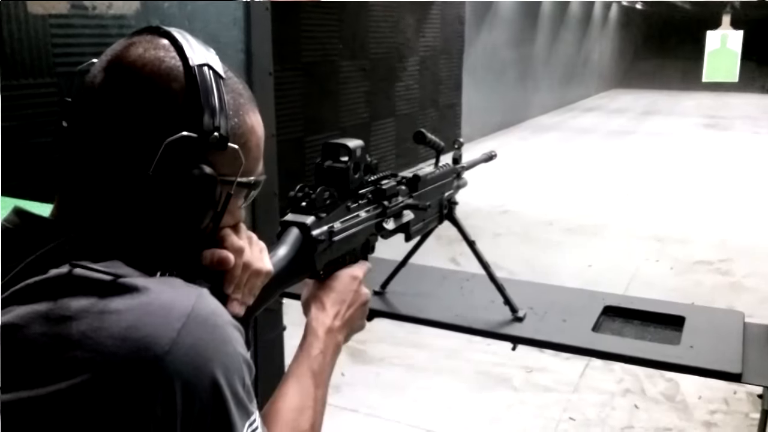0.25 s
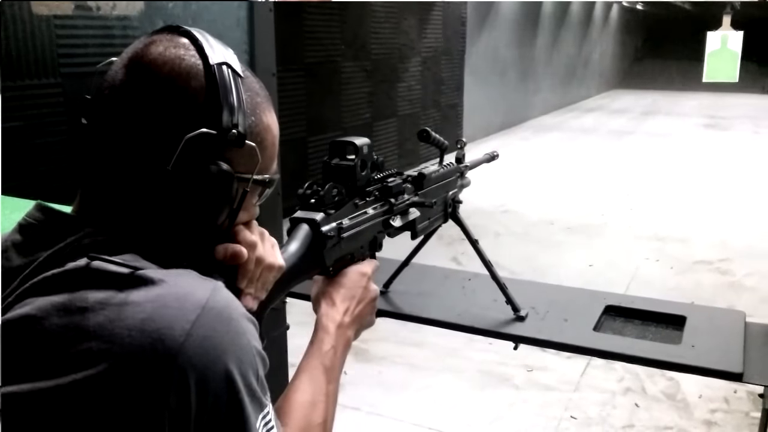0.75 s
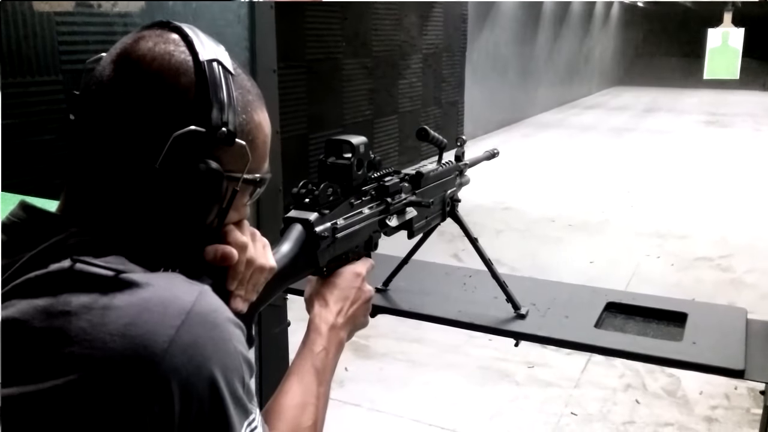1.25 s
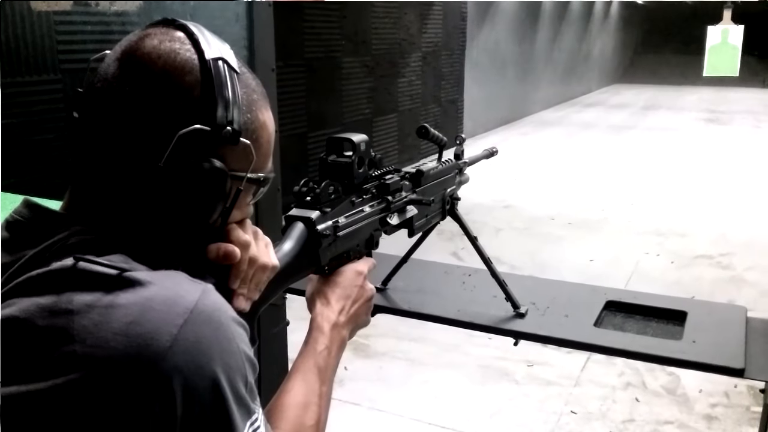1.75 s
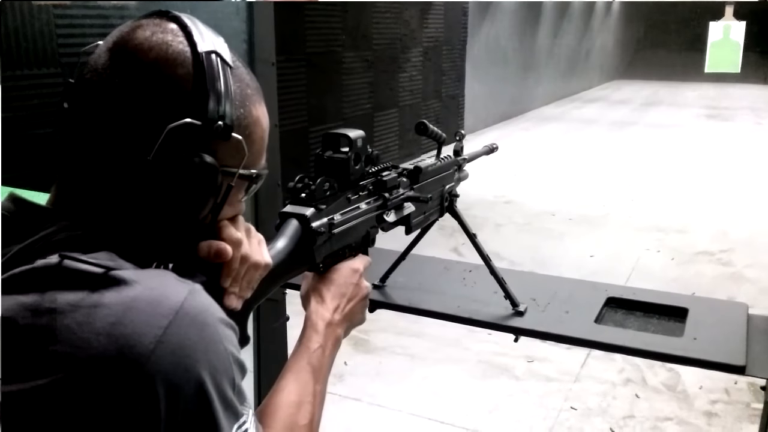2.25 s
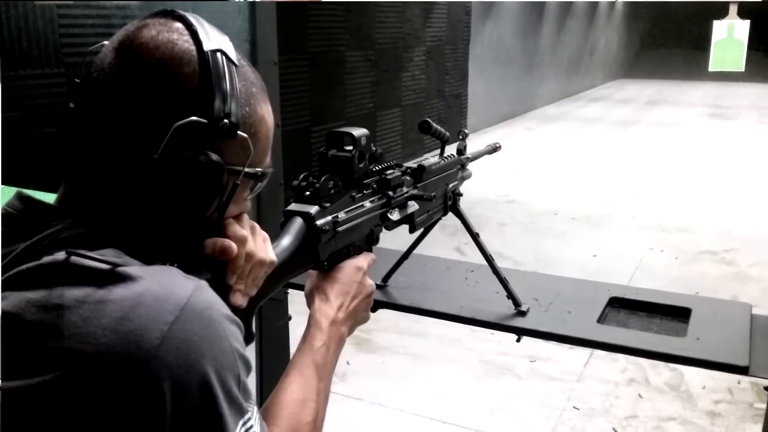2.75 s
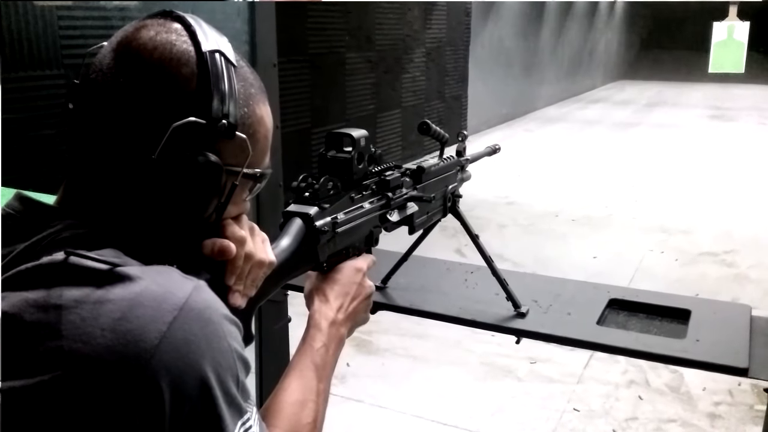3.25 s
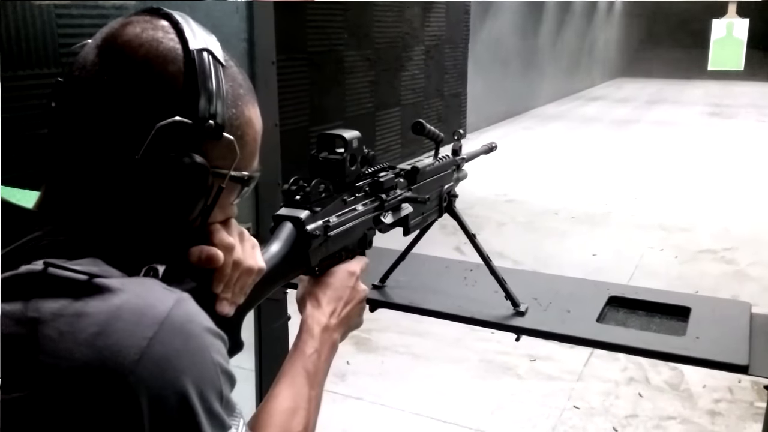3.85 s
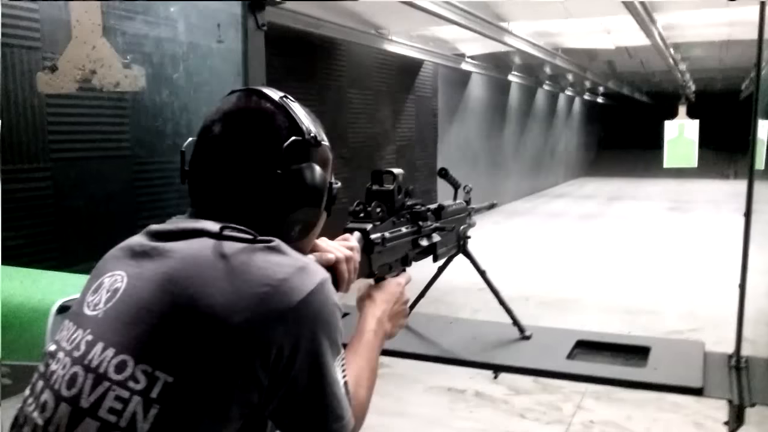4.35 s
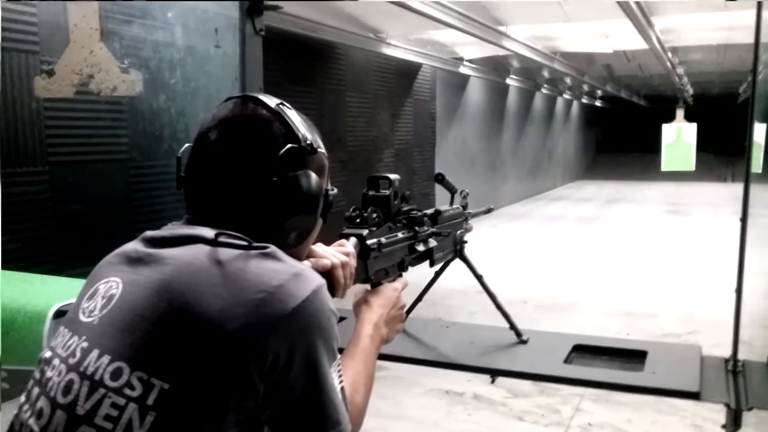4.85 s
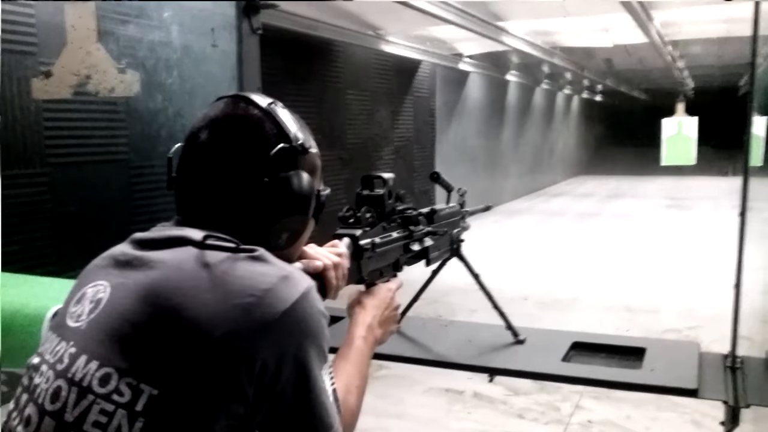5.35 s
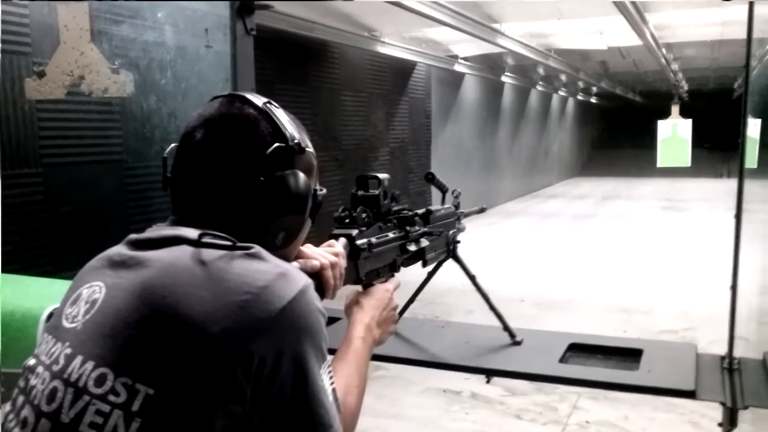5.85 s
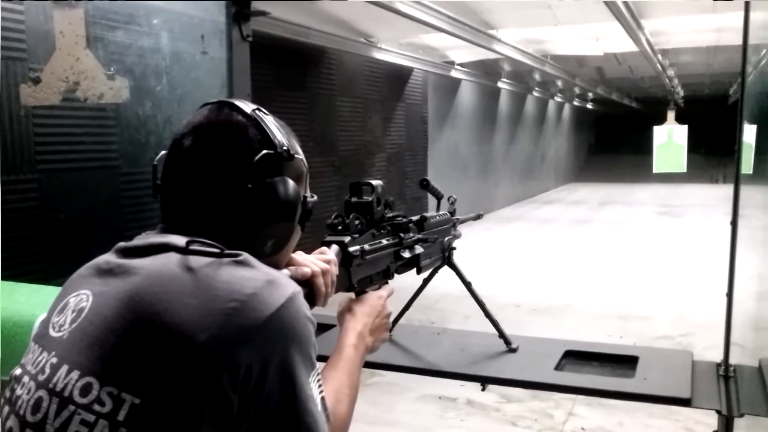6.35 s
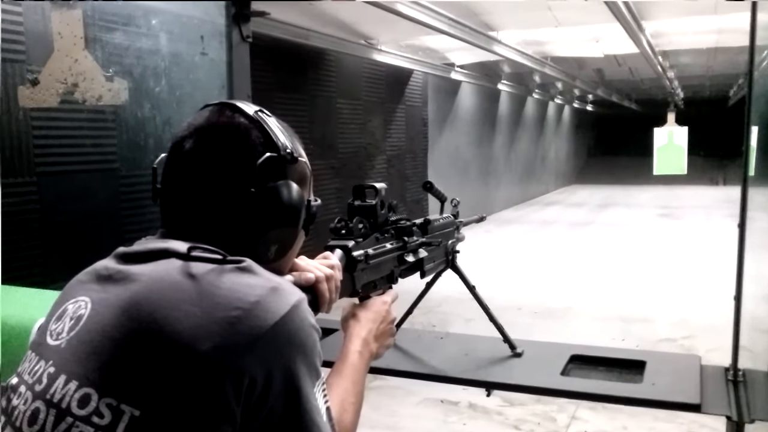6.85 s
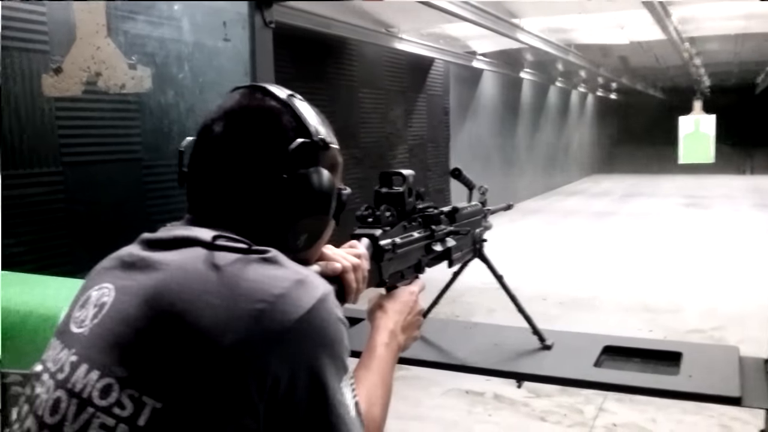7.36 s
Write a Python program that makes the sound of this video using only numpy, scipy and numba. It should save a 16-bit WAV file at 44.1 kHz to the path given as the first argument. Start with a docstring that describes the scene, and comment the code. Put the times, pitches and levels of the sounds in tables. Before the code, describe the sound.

Six spaced, distorted gun blasts with long hall echoes, bolt rattle and tinkling cases; an abrupt cut to rushing air comes after the fourth.

```python
"""Rushing air is heard loud over a steady fan until a machine gun fires single heavy shots in a long concrete
range. At each shot the bolt rattles, then the blast fills the hall and overloads the two microphone ports of a
phone. As the echo dies, spent cases ring on the floor over the fan and the air, now heard fainter. A cut ends
the fourth shot early and opens with the air heard loud again and a thin whistle, from further behind the gun;
two more shots follow. Filtered noise makes air, bolt and echoes; fading tones make the brass and the boom of
the hall."""
import sys
import numpy as np
from scipy import signal
from scipy.fft import rfft, irfft, next_fast_len
from scipy.io import wavfile
from scipy.ndimage import uniform_filter1d
from numba import njit

SR = 44100
rng = np.random.default_rng(int(sys.argv[2]) if len(sys.argv) > 2 else 0)


def wav_out(sig):
    """Save sig, one row per channel (or a flat mono array), as 16-bit PCM at SR to the path in sys.argv[1]."""
    wavfile.write(sys.argv[1], SR, np.round(np.clip(np.atleast_2d(sig).T, -1, 1) * 32767).astype(np.int16))


N = 335601
CUT_S = 4.196
OVERLOAD_DB = -4.5  # level at which the ports flatten the sound
STEP = 32  # samples between envelope points

# The shots: time [t/s], blast before the crowding of echoes, over the overload point [level/dB],
# extra bass [level/dB], early thud and boom of the low mode, both against the blast [level/dB],
# bolt rattle at its peak [level/dB]
SHOTS = [(0.0556, 13, 8, -11, -7, -21), (1.068, 12.5, -1.5, 8, -14.5, -30.5),
         (1.9974, 12.5, -2.8, -13, -14.5, -34), (3.848, 10.5, -11.5, -20, -24, -29.5),
         (5.181, 12, -5, 10, -21.5, -21.5), (7.162, 12.5, -12.5, -17, -23, -26.5)]
# Echo of the hall: pitch [f/Hz], relative strength per Hz [level/dB], time to fall by 60 dB once
# the fall is under way [t/s], likeness of left and right [-1..1]
HALL_ECHO = [(40, -19, 2.5, 0.76), (98.7, -3.5, 1.72, 0.98), (202, -4.5, 1.36, 0.61), (292, -3, 1.82, 1),
             (400, -2.5, 1.497, 0.83), (726, -1, 1.74, 0.62), (1103, -2, 1.655, 0.12),
             (1976, -3.5, 1.29, -0.41), (2560, -2, 1.486, 0.27), (4000, -4.5, 1.274, -0.093),
             (5000, -3, 1.34, -0.013), (6800, -4.5, 0.72, 0.1), (10500, -12.5, 0.52, -0.8),
             (17100, -43.5, .4, 0)]


def undb(db):
    """Turn decibels into a plain amplitude factor."""
    return 10 ** (np.asarray(db) / 20)


def unit(x):
    """Scale a sound to an average (RMS) strength of 1."""
    return x / np.sqrt(np.mean(x ** 2))


def over_hz(table, hz):
    """Read the columns of a table along a log-frequency axis, with straight lines between rows."""
    f, *columns = np.transpose(table)
    return [np.interp(np.log(np.maximum(hz, 1)), np.log(f), c) for c in columns]


def narrow(hz, width_hz):
    """Noise ringing in one resonance: a tone that wavers."""
    b, a = signal.iirpeak(hz, hz / width_hz, fs=SR)
    return unit(signal.lfilter(b, a, rng.standard_normal(N)))


def diffuse(size):
    """Spectra of left and right for sound from all sides, combed by the flutter between the stall walls."""
    # Echo across the stall: pitch [f/Hz], share the walls return [0..1]
    returned = [(150, 0.1), (300, .7), (700, 0.64), (1200, 0.15), (2500, 0.027)]
    flutter_s = .00998
    hz = np.arange(size // 2 + 1) * SR / size
    like = np.clip(over_hz(HALL_ECHO, hz)[2], -1, 1)
    mid, side = rfft(rng.standard_normal((2, size)))
    share = np.clip(over_hz(returned, hz)[0], 0, 1)
    back = share * np.exp(-2j * np.pi * hz * flutter_s)
    pair = np.sqrt(1 + like) * mid + np.sqrt(1 - like) * side * np.array([[1], [-1]])
    return hz, pair * (1 + back) / np.sqrt(1 + abs(back) ** 2)


def walk(rate):
    """Random levels held for about 1 / rate seconds and smoothed twice, at envelope points."""
    k = int(SR / STEP / rate)
    held = np.repeat(rng.standard_normal(N // 1000), k)[:N // STEP + 1]
    return uniform_filter1d(uniform_filter1d(held, k), k)


def full(envelope):
    """Fill in the samples between envelope points."""
    return np.interp(np.arange(N), np.arange(len(envelope)) * STEP, envelope)


def air():
    """Rushing air is shaped noise; a narrow resonance in noise makes the whistle that swells now and then."""
    # Colour of the rush: pitch [f/Hz], relative strength per Hz [level/dB]
    rush_colour = [(18, -44), (30, 11.5), (100, 7), (345, -3.5), (415, -5), (449, -7), (600, -9.5),
                   (937, -16), (2350, -15), (4910, -17), (9220, -36), (11700, -45), (16000, -49.5)]
    # Faint air after a loud stretch: before the cut, after the cut [level/dB]
    faint_db = [-53.5, -47]
    # Swells of the whistle: time [t/s], strength added [level/dB]
    whistle_swells = [(4.51, -58), (4.64, -56), (4.74, -60), (4.835, -48), (5.0, -53), (5.05, -57),
                      (5.115, -54)]
    loud_db, sag_db_per_s = -26.5, 4.5
    whistle_hz, whistle_width_hz, whistle_db = 11500, 60, -64
    rise_s, whistle_t60_s = .012, 0.28

    size, t = next_fast_len(N), np.arange(N) / SR
    hz, pair = diffuse(size)
    rush = irfft(pair * undb(over_hz(rush_colour, hz)[0]), size)[:, :N]

    # loud from the start and from the cut, each time up to the next shot
    starts = np.array(SHOTS)[:, 0]
    late = t > CUT_S
    loud = t < np.where(late, starts[starts > CUT_S][0], starts[0])
    sagging_db = loud_db - sag_db_per_s * (t - late * CUT_S)
    air_db = np.where(loud, sagging_db, np.where(late, faint_db[1], faint_db[0]))

    swell = undb(whistle_db)
    for s, db in whistle_swells:
        age = np.maximum(t - s, 0)
        swell = swell + np.minimum(age / rise_s, 1) * undb(db - 60 * age / whistle_t60_s)
    whistle = np.array([narrow(whistle_hz, whistle_width_hz) for _ in range(2)])
    whistle = whistle * swell * (loud & late)  # only between the cut and the next shot
    return unit(rush) * undb(air_db) + whistle


def fan():
    """A steady fan: noise that partly repeats with every turn, and its strongest tones."""
    # Colour of the fan noise: pitch [f/Hz], relative strength per Hz [level/dB]
    fan_colour = [(18, -60.5), (30, -28.5), (86, 6), (239, -16.5), (295, -2), (355, -17.5), (415, -7.5),
                  (449, -22.5), (760, -6.5), (889, -2), (1070, -11.5), (2480, -7), (16000, -42)]
    # Tones of the fan: pitch [f/Hz], strength [level/dB]
    fan_tones = [(511.4, -64.5), (565.2, -59), (710.6, -58.5), (904.4, -66), (995.9, -61), (1125, -59.5),
                 (1556, -64.5), (2363, -62)]
    noise_db, turn_s, repeat = -47, .0354, .55  # repeat: share of the noise that returns each turn
    size = next_fast_len(N)
    hz, pair = diffuse(size)
    turn = repeat * np.exp(-2j * np.pi * hz * turn_s)
    noise = irfft(pair * undb(over_hz(fan_colour, hz)[0]) / (1 - turn), size)[:, :N]
    out = unit(noise) * undb(noise_db)
    for f, db in fan_tones:
        tone = narrow(f, 2.5)
        out += undb(db) * np.array([tone, tone[::-1]])  # reversed, so the two ports are unrelated
    return out


def bolt():
    """The bolt slams home: a steel rattle, made of band-filtered noise, swells and sinks around each shot."""
    lead_s, length_s = 0.025, 0.028  # starts before the blast and ends just after it begins
    out, t = np.zeros((2, N)), np.arange(N) / SR
    sos = signal.butter(1, [1500, 6000], "band", fs=SR, output="sos")
    rattle = unit(signal.sosfilt(sos, rng.standard_normal((2, N))))
    for s, *_, db in SHOTS:
        progress = np.clip((t - s + lead_s) / length_s, 0, 1)
        out += undb(db) * np.sin(np.pi * progress ** 0.69) * rattle
    return out


def dying(levels_db, t60, build):
    """Loudness of what all shots leave in the hall; energies add up, and the cut silences earlier shots."""
    direct_db, walls_wait_s = -21.5, .003  # wait from the blast to the first walls
    hold_s = .2
    crowd_db, crowd_s = 5.5, .63  # the first rounds of echoes keep the hall fuller, then pass
    t, energy = np.arange(N // STEP + 1) * STEP / SR, 0
    for (s, *_), db in zip(SHOTS, levels_db):
        age = np.maximum(t - s, 0)
        heard = (t > s) & ((t < CUT_S) | (s > CUT_S))
        # the weak direct sound behind the muzzle, then the walls join in
        walls = (1 - np.exp(-np.maximum(age - walls_wait_s, 0) / build)) ** 3
        fill = undb(2 * direct_db) + walls
        # the far end of the long hall feeds back at first, so the fall starts slowly
        spent = age ** 2 / (age + hold_s)
        crowd = crowd_db * np.exp(-(age / crowd_s) ** 6)
        energy = energy + heard * fill * undb(2 * (db + crowd) - 120 * spent / t60)
    return np.sqrt(energy)


def hall():
    """Each band of the blast surges and dies at its own rate; bass builds up later and a low mode booms on."""
    build_s = 0.021  # at 100 Hz
    surge_db, surge_rate = 1.5, 11.  # separate in each band; rates in steps per second
    lump_db, lump_rate = 6.5, 28.  # together in all bands
    bunched_s = 0.74  # surges and thumps even out over this time
    thud_t60_s, thud_build_s = 0.617, .06  # a short swell of bass ahead of the long echo
    boom_hz, boom_t60_s, boom_build_s = 95.3, 1.92, 0.5

    size = next_fast_len(N)
    hz, pair = diffuse(size)
    pair = pair * undb(over_hz(HALL_ECHO, hz)[0])
    pair = (pair / np.sqrt(np.mean(irfft(pair, size) ** 2))).astype(np.complex64)
    starts, blast_db, bass_db, thud_db, boom_db, _ = np.transpose(SHOTS)
    t = np.arange(N // STEP + 1) * STEP / SR
    since_shot = np.where(t[:, None] > starts, t[:, None] - starts, np.inf).min(axis=1)
    bunched = np.exp(-(since_shot / bunched_s) ** 2)
    thud = dying(blast_db + thud_db, thud_t60_s, thud_build_s)
    lumps = lump_db * walk(lump_rate)  # bunched reflections thump, most in the lower bands

    # overlapping bands, 2/3 octave apart
    place, echo = np.log2(np.maximum(hz, 1) / 40).astype(np.float32) * 1.5, 0
    for band in range(14):
        centre = 40 * 2 ** (band / 1.5)
        bassy = 1 / (1 + (centre / 350) ** 2)
        t60 = over_hz(HALL_ECHO, centre)[1]
        fade = dying(blast_db + bassy * bass_db, t60, build_s * (centre / 100) ** -.4)
        fade = np.hypot(fade, bassy * thud)
        uneven_db = bunched * (surge_db * walk(surge_rate) + lumps / (1 + centre / 2500))
        in_band = (pair * np.clip(1 - abs(place - band), 0, 1))[:, place < band + 1]
        echo = echo + irfft(in_band, size)[:, :N] * full(fade * undb(uneven_db))

    # the low mode wavers in pitch, and in level separately at the two ports
    phase = 2 * np.pi * np.cumsum(full(boom_hz + 3.98 * walk(14.))) / SR
    waver = undb(4.9 * np.array([walk(16.), walk(16.)]))
    swell = dying(blast_db + boom_db, boom_t60_s, boom_build_s) * waver
    tones = np.sin(phase + [[0], [1.1]]) * undb([[2.5], [-2.5]])
    boom = tones * [full(side) for side in swell]
    return (echo + boom) * undb(OVERLOAD_DB)


def cases():
    """Spent cases bounce: each thin brass tube gives a tick, then high rings that waver among the echoes."""
    # Bounces: time [t/s], low, middle and top ring at their start [level/dB]
    bounces = [(.779, -60, -29, -52), (1.758, -77, -54, -62), (1.859, -50, -49, -52),
               (1.905, -54, -40, -43), (2.680, -77, -56, -57), (2.871, -76, -67, -62),
               (5.844, -71, -59, -72), (6.119, -56, -54, -56), (6.380, -52, -54, -55)]
    # Rings of a brass tube, low to top: pitch [f/Hz], time to fall by 60 dB [t/s]
    ring_modes = [(10880, 0.56), (14900, 0.34), (15550, .4)]
    out, t = np.zeros((2, N)), np.arange(30000) / SR
    noise = rng.standard_normal((len(bounces), 2, len(t)))
    for k, (s, *rings_db) in enumerate(bounces):
        tick = np.diff(noise[k], axis=1, prepend=0)
        ring = undb(max(rings_db) - 13.5 - 60 * t / .07) * tick
        # slow noise moves each ring in strength and phase
        waver = uniform_filter1d(np.array([noise[k - 1], noise[k - 2]]), size=500)
        for db, (hz, t60) in zip(rings_db, ring_modes):
            angle = 2 * np.pi * hz * t
            tone = waver[0] * np.sin(angle) + waver[1] * np.cos(angle)
            ring += undb(db - 60 * t / t60) * unit(tone)
        i = int(s * SR)
        out[:, i:i + len(t)] += ring
    return out


def colour(x, table):
    """Tone filter from rows of pitch and gain; folding the cepstrum of the log gain avoids any pre-echo."""
    size = 1024
    hz = np.arange(size // 2 + 1) * SR / size
    ceps = irfft(np.log(undb(over_hz(table, hz))), size)
    ceps[:, 1:size // 2] *= 2
    ceps[:, size // 2 + 1:] = 0
    response = irfft(np.exp(rfft(ceps)), size)
    return signal.oaconvolve(x, response, axes=1)[:, :N]


def smear(x):
    """All-pass filters shift the phases but not the tone balance, so flattened tops turn ragged again."""
    # All-pass stages: centre [f/Hz], sharpness Q [no unit]
    stages = [(600, 1.2), (1400, 1.6), (2600, 2.2), (4200, 2.4), (7500, 2.2)]
    hz, q = np.transpose(stages)
    w = 2 * np.pi * hz / SR
    a, c = np.sin(w) / (2 * q), -2 * np.cos(w)
    sos = np.transpose([1 - a, c, 1 + a, 1 + a, c, 1 - a] / (1 + a)).copy()
    return signal.sosfilt(sos, x)


@njit
def follow(x, attack, release):
    """Track loudness with one smoothing speed for rising and another for sinking."""
    e, out = 1e-6, np.empty(len(x))
    for i in range(len(x)):
        e += (x[i] - e) * (attack if x[i] > e else release)
        out[i] = e
    return out


def squeeze(x):
    """Gain control: turn down what is above the limit, looking a little ahead."""
    limit_db, ratio, makeup_db = -20.5, 2.37, 4
    attack_s, release_s, look_ahead_s = 0.011, 0.042, .005
    loud = follow(np.abs(x).mean(axis=0), 1 / (attack_s * SR), 1 / (release_s * SR))
    ahead = int(look_ahead_s * SR)
    loud = np.append(loud[ahead:], np.full(ahead, loud[-1]))
    gain = np.minimum(undb(limit_db) / loud, 1) ** (1 - 1 / ratio)
    return x * undb(makeup_db) * gain


def scene():
    """Add up all sources at the two ports."""
    return air() + fan() + bolt() + hall() + cases()


def record(dry):
    """The ports colour the sound, the capsules flatten at their limit, filters and gain control follow."""
    # Colour of the ports, one table before the cut and one after it, from further behind the gun:
    # pitch [f/Hz], left gain [level/dB], right gain [level/dB]
    port_colours = [
        [(100, 0, 0.5), (594, -2.5, -4), (1510, -0.5, -0.5), (1940, -5.5, -3), (2500, -5, 0.5),
         (3200, -3.5, 1.5), (4130, 0.5, 6.5), (4510, 4.5, 0.5), (5800, -5.5, -5)],
        [(100, 0.5, 0), (600, -1.5, -1), (1500, -1.5, 1.5), (1900, -4.5, 3), (2280, -4, 6), (3020, -7, 0),
         (4060, -0.5, 4), (4960, 1.5, -1.5), (5560, -7.5, -4)],
    ]
    # Tone after the overload: pitch [f/Hz], gain [level/dB]
    later_colour = [(30, -23.5), (100, -9.5), (400, -1), (2000, 6), (5000, 0.17), (8000, 0.5), (12000, 4),
                    (16000, 3)]
    top_hz = 15780
    before, after = [colour(dry, table) for table in port_colours]
    x = np.where(np.arange(N) / SR < CUT_S, before, after)
    x = np.clip(x / undb(OVERLOAD_DB), -1, 1) * undb(OVERLOAD_DB)
    x = smear(colour(x, later_colour))
    # gain control works on each side of the cut on its own
    x = np.hstack([squeeze(part) for part in np.hsplit(x, [int(CUT_S * SR)])])
    low_pass = signal.ellip(10, .2, 70, top_hz, fs=SR, output="sos")
    return signal.sosfilt(low_pass, np.clip(x, -.87, .87))


dry = scene()
out = record(dry)
wav_out(out)
```